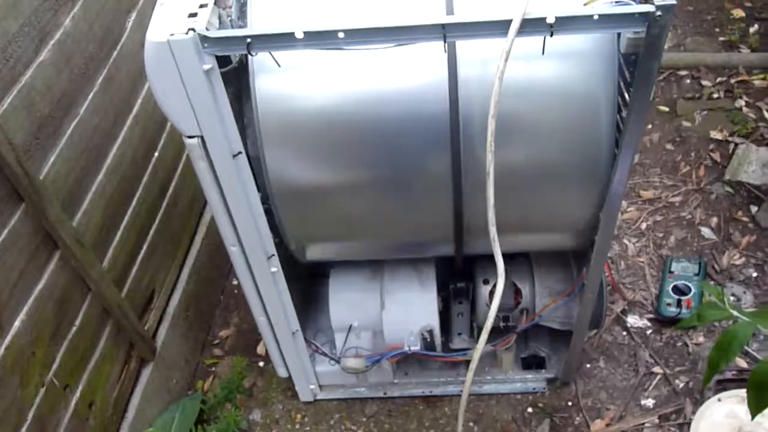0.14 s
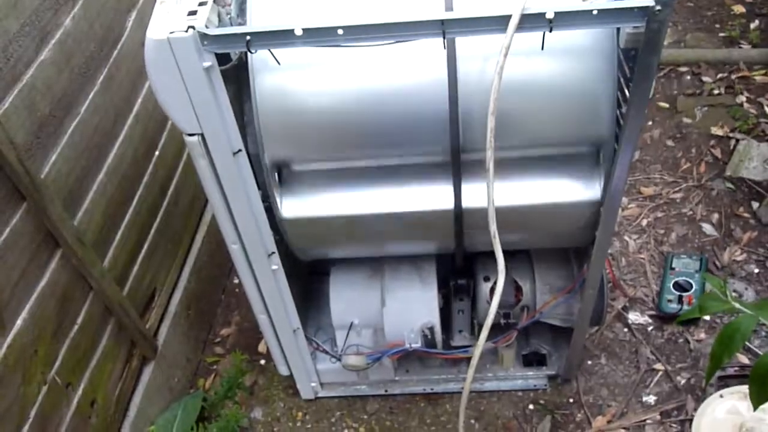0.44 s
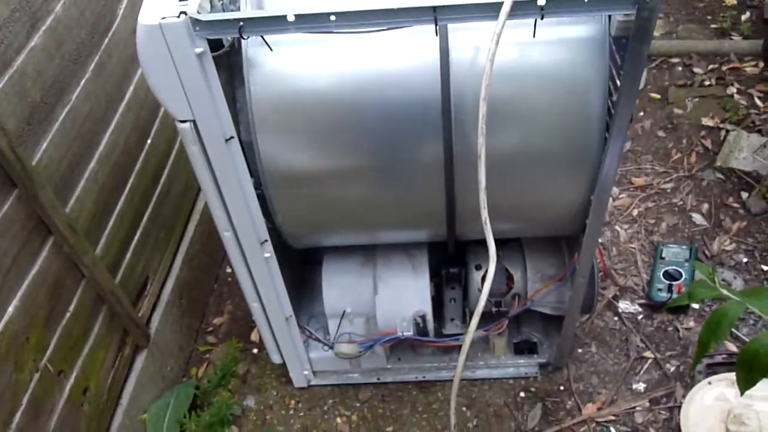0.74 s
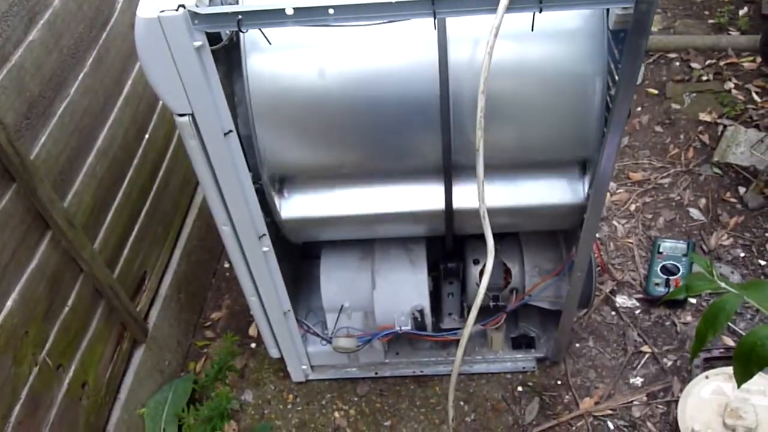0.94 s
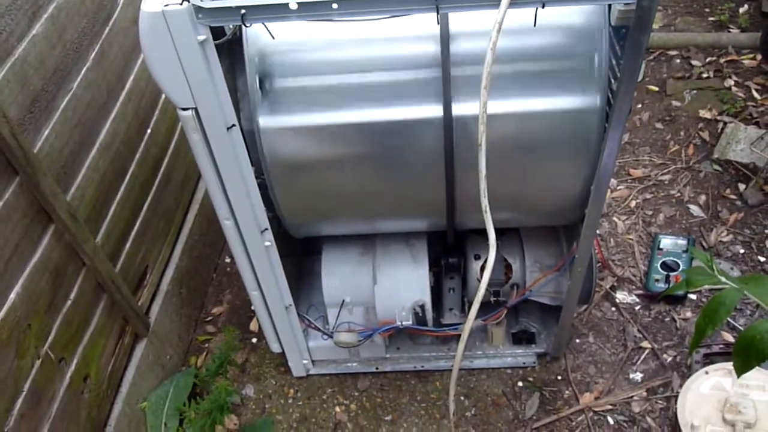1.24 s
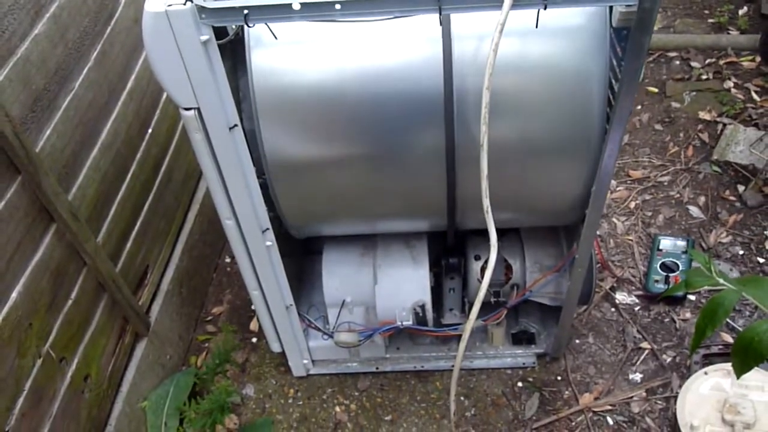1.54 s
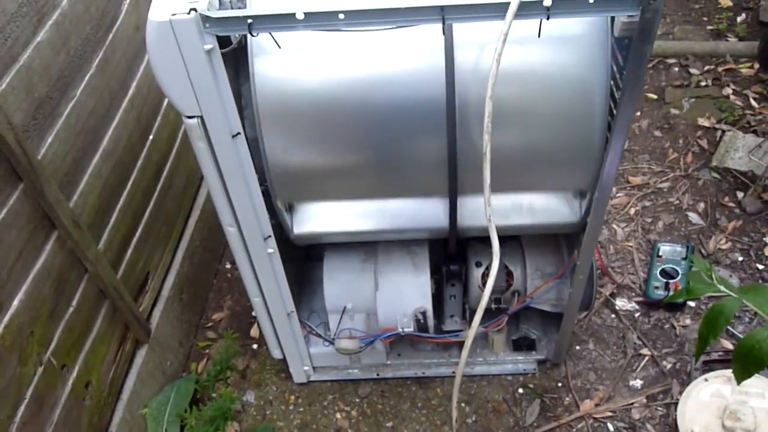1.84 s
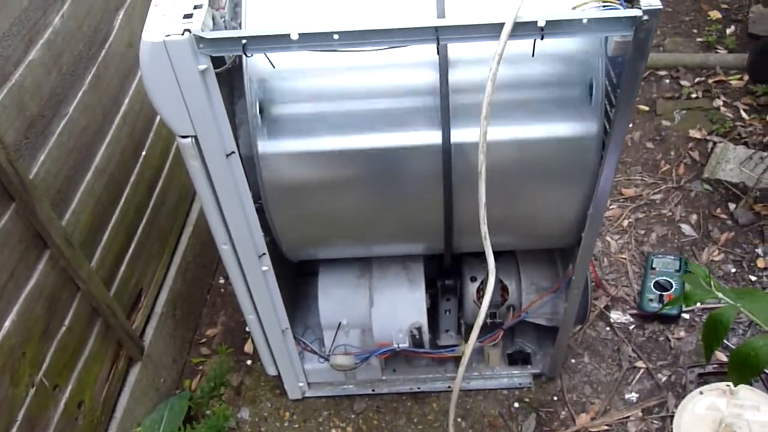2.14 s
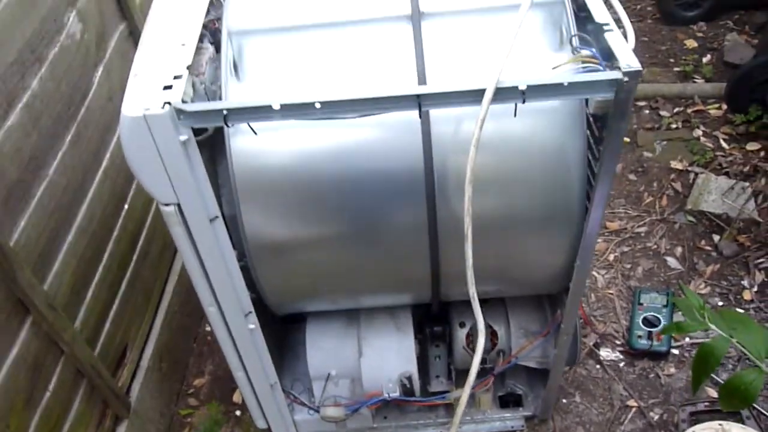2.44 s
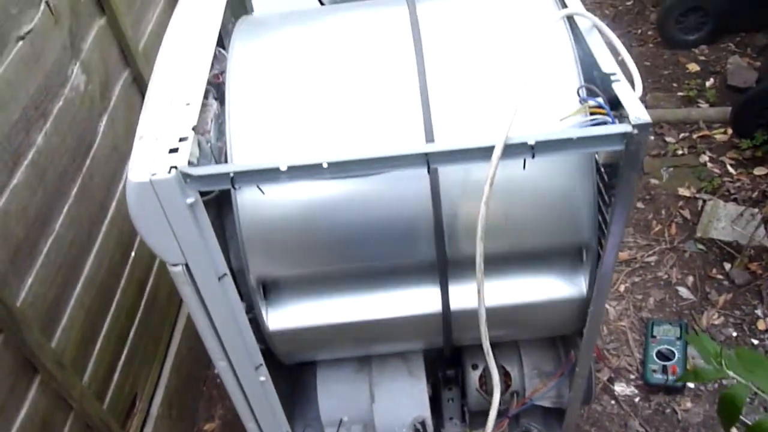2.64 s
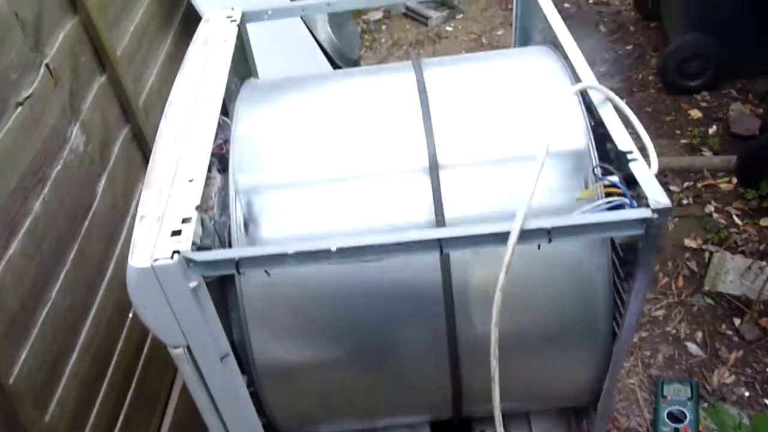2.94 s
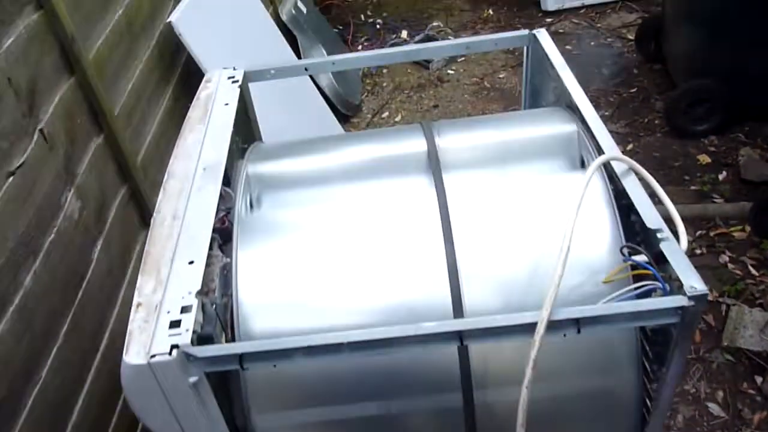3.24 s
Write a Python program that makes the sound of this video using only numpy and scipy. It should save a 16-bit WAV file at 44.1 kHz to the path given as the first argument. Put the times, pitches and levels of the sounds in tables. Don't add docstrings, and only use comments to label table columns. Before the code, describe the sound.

A tumble dryer, opened up in a yard, starts abruptly at 0.2 s already running, about a metre from a hand-held stereo microphone. Mid-heavy drum rumble, wavering whine near 1040 Hz, hollow housing resonance and quieter fan hiss continue throughout. A sharp hiss puff bursts at 0.62 s. Hollow sheet-metal knocks with scrapes come around 0.23, 0.38, 0.7, 1.2, 1.6, 1.9, 2.4, 2.55, 2.94 (strongest) and 3.26 s; whine weakens around 3 s.

```python
import sys
import numpy as np
from scipy import signal
from scipy.fft import rfft, irfft
from scipy.io import wavfile
from scipy.ndimage import uniform_filter1d

SR = 44100
rng = np.random.default_rng(int(sys.argv[2]) if len(sys.argv) > 2 else 0)


def how_loud(loudness_db):
    steps = np.asarray(loudness_db, float) / 20
    return 10 ** steps


def transcribe(signal):
    frames = np.atleast_2d(signal).T
    limited = np.clip(frames, -1, 1)
    pcm = np.round(limited * 32767).astype(np.int16)
    wavfile.write(sys.argv[1], SR, pcm)


N = 149058

# freq_hz, level_db (per Hz), side_over_mid_db
DRUM_COLOUR = [(55, -40, -9), (94, -12, -32), (240, -2.5, -46), (620, -3.5, -20.5), (670, -5, -20.5),
               (1160, -7, -16.5), (2020, -16.5, -4.5), (2857, -25.5, 0.5)]
# freq_hz, level_db (per Hz), side_over_mid_db
FAN_COLOUR = [(1770, -28.5, -12), (3060, 1, -0.5), (4200, -1, -2.5), (6000, -2, -4), (8370, -2.5, -2),
              (11700, -9, 3), (14000, -10, 0), (15700, -19, 0)]
# freq_hz, left_minus_right_db
NOISE_LEAN = [(300, -0.06), (1200, -1), (2500, -3.5), (5500, -1.3), (8600, 0.8), (11000, -.5)]
# time_s, pitch_hz, level_db
WHINE_PATH = [(.2, 1030, -28), (.45, 1036, -29), (.65, 1043, -28), (.9, 1034, -28), (1.05, 1027, -26.5),
              (1.3, 1040, -28.5), (1.8, 1034, -28.5), (2.2, 1043, -27.5), (2.55, 1041, -28.5),
              (2.88, 1031, -34), (3.1, 1032, -39), (3.22, 1044, -33), (3.38, 1049, -31)]
# freq_hz, level_db, t60_s
HOUSING_MODES = [(307, -0.5, 0.055), (363, 0.5, 0.067), (503, -3, .05), (936, 3.5, 0.032), (1402, -17, .04),
                 (1825, -5.5, 0.036), (2090, -12, .04)]
# freq_hz, level_db (per Hz), side_over_mid_db
WIND_COLOUR = [(30, -16, -3), (55, -3, -3), (90, 0, -3), (160, -20, -3)]
# start_s, clank_db, thud_db, left_minus_right_db
KNOCK_EVENTS = [(.234, -16.5, -30, 2), (.25, -29, -28, 1), (.375, -19.5, -15, 1), (.39, -25.5, -22, -2),
                (.694, -20, -19, -3), (.706, -17, -24, -1), (1.21, -18, -25, 3), (1.61, -16, -34, 0),
                (1.878, -17.5, -13.5, -2), (1.894, -20, -14.5, -2), (2.269, -37, -20.5, -1),
                (2.372, -22.5, -27, 9), (2.555, -17.5, -38, -1), (2.939, -12.5, -10, -4),
                (2.976, -23.5, -41, 2), (3.261, -19, -27, 1)]
# freq_hz, level_db, t60_s
THUD_MODES = [(370, -8, .05), (490, 0, .07), (565, -1, .045), (660, -6, .03), (790, -6, .03)]
# freq_hz, level_db, t60_s
CLANK_MODES = [(820, -5, .03), (1150, -7, .03), (1290, -5, .035), (1480, -6, .03), (1780, -4, .03),
               (2000, 0, .035), (2230, -5, .03), (3150, -10, .025), (3800, -13, .02)]
# centre_s, level_db, pitch_hz
BUMP_EVENTS = [
    (.5, -50, 45),
    (2.73, -39, 45),
]
# freq_hz, level_db (per Hz), side_over_mid_db
PUFF_COLOUR = [(1500, 0, -8.5), (3540, -4, 0), (4900, -8, -1), (6030, 2, -6), (9800, 0.5, 0),
               (14600, -1.5, 1), (16000, -10, 0)]
# start_s, level_db, left_minus_right_db
TICK_EVENTS = [
    (1.29, -40, 6),
    (2.371, -26.5, 6),
]
# centre_hz, width_hz, depth_share
CAMERA_NOTCHES = [(2600, 420, .93), (4600, 800, .94), (7920, 600, .88)]


def level(x, db):
    return x * how_loud(db) / np.sqrt(np.mean(x ** 2))


def walk(rate):
    hold = int(SR / rate)
    steps = rng.standard_normal(N // 50)[:N // hold + 1]
    slewed = uniform_filter1d(np.repeat(steps, hold), hold)
    return 1.74 * uniform_filter1d(slewed, hold)[:N]


def pan(mid, side, db):
    return np.array([(mid + side) * how_loud(db / 2), (mid - side) * how_loud(-db / 2)])


def noise(table, swell_db, flicker_db):
    octave = np.log2(np.arange(N // 2 + 1) * SR / N + 1)
    rows, lean = np.array(table), np.array(NOISE_LEAN)

    def curve(points, column):
        return np.interp(octave, np.log2(points[:, 0]), points[:, column])

    inside = (octave > np.log2(rows[0, 0]) - 1) * (octave < np.log2(rows[-1, 0]))
    gain = how_loud(curve(rows, 1)) * inside
    mid, side = rfft(rng.standard_normal((2, N)))
    both = pan(mid * gain, side * gain * how_loud(curve(rows, 2)), curve(lean, 1))
    if not flicker_db:
        return irfft(both, N)
    out, swell = 0, swell_db * walk(3.52)
    for centre in np.arange(4, 14.5, .5):
        share = np.cos(np.pi / 2 * np.clip(2 * (octave - centre), -1, 1)) ** 2
        flicker = flicker_db * walk(12.0)
        if (share * gain).any():
            out = out + how_loud(swell + flicker) * irfft(both * share, N)
    return out


def ring(x, modes):
    out = 0
    for hz, db, t60_s in modes:
        pole = np.exp(2j * np.pi * hz / SR - np.log(1000) / (t60_s * SR))
        out = out + how_loud(db) * signal.lfilter([1], [1, -pole], x.astype(complex)).imag
    return out


def drum():
    return level(noise(DRUM_COLOUR, swell_db=.4, flicker_db=1.5), -26.5)


def fan():
    return level(noise(FAN_COLOUR, swell_db=.5, flicker_db=0.87), -38)


def motor():
    t, rows = np.arange(N) / SR, np.array(WHINE_PATH)
    pan_db, lead_rad, overtone_db, overtone_pan_db = -2, 0.25, -21, -11
    hum_hz, hum_db, hum_flutter_db = 200.2, -42, 3.0
    pitch_hz = np.interp(t, rows[:, 0], rows[:, 1]) + 2.0 * walk(39.9)
    phase = 2 * np.pi * np.cumsum(pitch_hz) / SR
    size = np.sqrt(2) * how_loud(np.interp(t, rows[:, 0], rows[:, 2]) + 1.2 * walk(70.))
    side = np.array([[.5], [-.5]])
    lead = lead_rad * side
    whine = how_loud(pan_db * side) * np.sin(phase + lead)
    overtone_size = how_loud(overtone_db + overtone_pan_db * side + 1.8 * walk(17.0))
    whine = whine + overtone_size * np.sin(2 * phase + 2.4 * lead)
    hum_size = np.sqrt(2) * how_loud(hum_db + hum_flutter_db * walk(7.52))
    return size * whine + hum_size * np.sin(2 * np.pi * hum_hz * t)


def housing():
    air = rng.standard_normal((2, N)) * how_loud(2.0 * walk(15.0))
    mid = ring(air[0], HOUSING_MODES)
    side = how_loud(-16.5) * ring(air[1], HOUSING_MODES[3:])
    return level(pan(mid, side, -0.8), -32)


def wind():
    return level(noise(WIND_COLOUR, swell_db=2.7, flicker_db=3.0), -55)


def strikes(times, db, contact_s):
    bounce_s, bounce_db = .0125, -4
    solid = 0.49
    out, n = np.zeros(N + SR), np.arange(400)
    for start_s, hit_db in zip(times, db):
        rough = rng.standard_normal((4, 401))
        for k in range(4):
            i = int((start_s + k * bounce_s * (1 + 0.0395 * rough[k, 0])) * SR)
            press = n * np.exp(-n / (contact_s * SR))
            burst = (solid - np.abs(rough[k, 1:])) * press
            out[i:i + 400] += how_loud(hit_db + k * bounce_db) * burst / np.sqrt(np.sum(burst ** 2))
    return out[:N]


def grit(times, db):
    t60_s, low_hz, high_hz, grain_db = .13, 600, 3000, 2.0
    kick = np.zeros(N)
    kick[(times * SR).astype(int)] = how_loud(db)
    fade = signal.lfilter([1], [1, -np.exp(-np.log(1000) / (t60_s * SR))], kick)
    band = signal.butter(2, [low_hz, high_hz], "band", fs=SR, output="sos")
    scrape = signal.sosfilt(band, rng.standard_normal((2, N)))
    mid, side = scrape * uniform_filter1d(fade, size=90)
    return pan(mid, 0.74 * side, 0) * how_loud(grain_db * walk(300.0))


def knocks():
    rattle_per_s, rattle_db, rattle_spread_db = 40, -45.5, 2.5
    contact_s, thud_contact_s = .0016, 0.00019
    start_s, clank_db, thud_db, lean_db = np.array(KNOCK_EVENTS).T
    clank_hit_db = clank_db - 4

    loose = rng.random((200, 2))
    times = np.cumsum(-np.log(loose[:, 0]) / rattle_per_s)
    heard = times < N / SR
    size_db = (rattle_db - rattle_spread_db * np.log(loose[:, 1]))[heard]
    rattle = strikes(times[heard], size_db, contact_s)

    thud = ring(strikes(start_s, thud_db - 8.5, thud_contact_s) + rattle, THUD_MODES)
    thud = signal.sosfilt(signal.butter(2, [360, 850], "band", fs=SR, output="sos"), thud)
    clank = ring(strikes(start_s, clank_hit_db, contact_s) + rattle, CLANK_MODES)
    wide = ring(strikes(start_s, clank_hit_db - 12, contact_s), CLANK_MODES[2:])
    lean = np.interp(np.arange(N) / SR, start_s, lean_db)
    thin = signal.butter(2, [250, 2600], "band", fs=SR, output="sos")
    return signal.sosfilt(thin, thud + pan(clank, wide, lean)) + grit(start_s, clank_db - 10.5)


def bumps():
    t, width_s, out = np.arange(N) / SR, .025, 0
    for centre_s, db, hz in BUMP_EVENTS:
        swell = np.exp(-((t - centre_s) / width_s) ** 2)
        out = out + how_loud(db) * swell * np.sin(2 * np.pi * hz * (t - centre_s))
    return out


def puff():
    start_s, attack_s, t60_s, tail_t60_s, tail_db = .6245, .0012, .08, .2, -6
    t = np.clip(np.arange(N) / SR - start_s, 0, None)
    fade = how_loud(-60 * t / t60_s) + how_loud(tail_db - 60 * t / tail_t60_s)
    shape = (1 - np.exp(-t / attack_s)) * fade
    return shape * level(noise(PUFF_COLOUR, 0, 0), -18.5)


def ticks():
    t, low_hz, t60_s, out = np.arange(N) / SR, 9000, .015, 0
    bright = signal.butter(2, low_hz, "high", fs=SR, output="sos")
    hiss = signal.sosfilt(bright, rng.standard_normal(N))
    for start_s, db, lean_db in TICK_EVENTS:
        fade = (t > start_s) * how_loud(db - 60 * np.clip(t - start_s, 0, 1) / t60_s)
        out = out + pan(hiss * fade, 0, lean_db)
    return out


def scene():
    steady = drum() + fan() + motor() + housing() + wind()
    return steady + knocks() + bumps() + puff() + ticks()


def band_limit(x):
    return signal.sosfilt(signal.butter(12, 16430, fs=SR, output="sos"), x)


def record(dry):
    top_hz, top_width_hz, bass_cut_hz = 15800, 550, 55
    start_s, fade_in_s, settle_db, settle_s = .2055, 0.00032, -23, 0.023
    hz, tone = np.arange(N // 2 + 1) * SR / N + 1e-3, rfft(dry)
    for centre_hz, width_hz, depth in CAMERA_NOTCHES:
        tone = tone * (1 - min(depth, 1) / (1 + 1j * (hz - centre_hz ** 2 / hz) / width_hz))
    tone = tone * np.clip((top_hz - hz) / top_width_hz, 0, 1) / (1 - 1j * bass_cut_hz / hz)
    t = np.arange(N) / SR - start_s
    on = np.clip(t / fade_in_s, 0, 1)
    offset = how_loud(settle_db) * np.exp(-np.abs(t) / settle_s)
    return band_limit(on * (irfft(tone, N) - offset))


dry = scene()
out = record(dry)
transcribe(out)
```